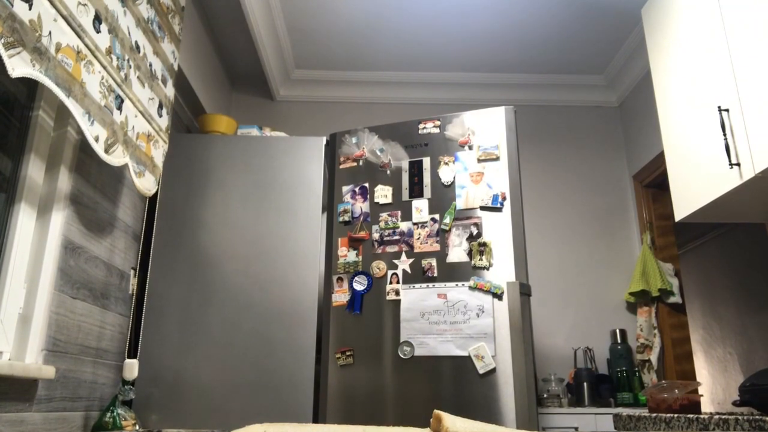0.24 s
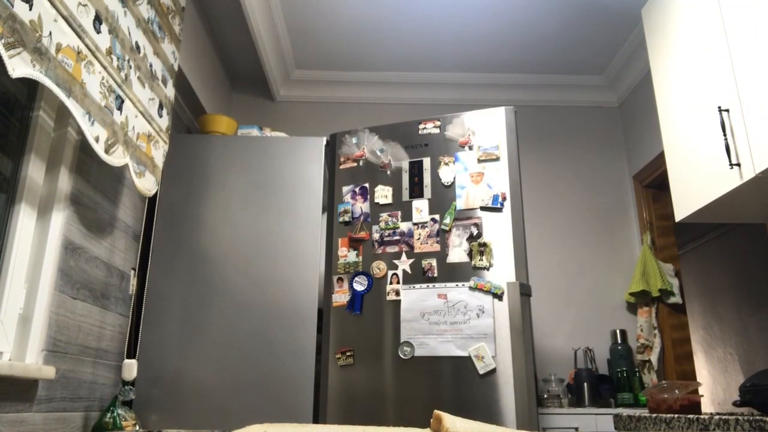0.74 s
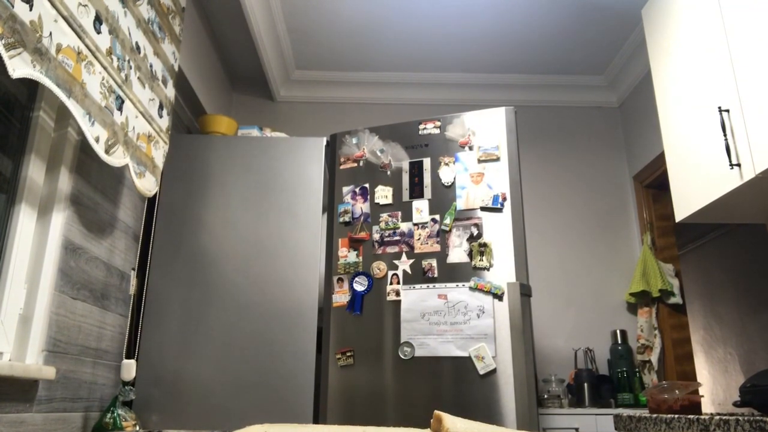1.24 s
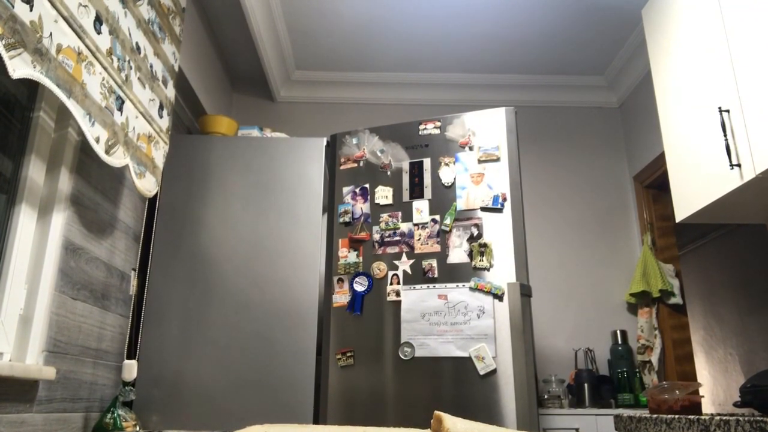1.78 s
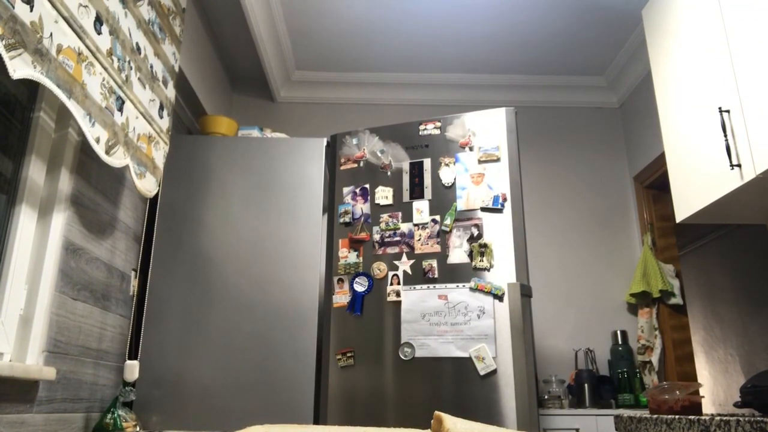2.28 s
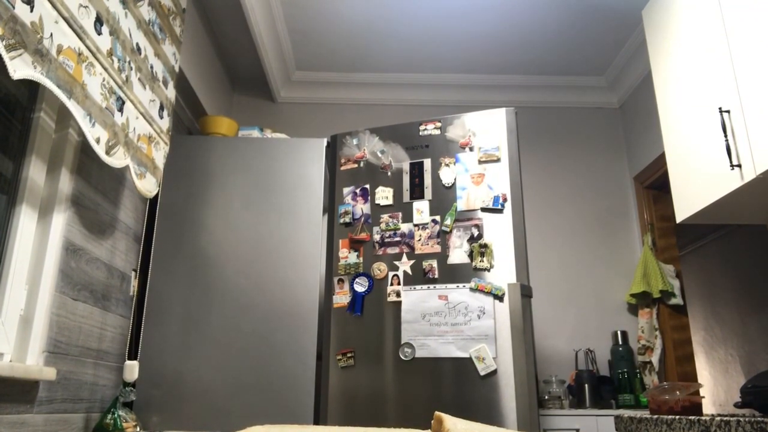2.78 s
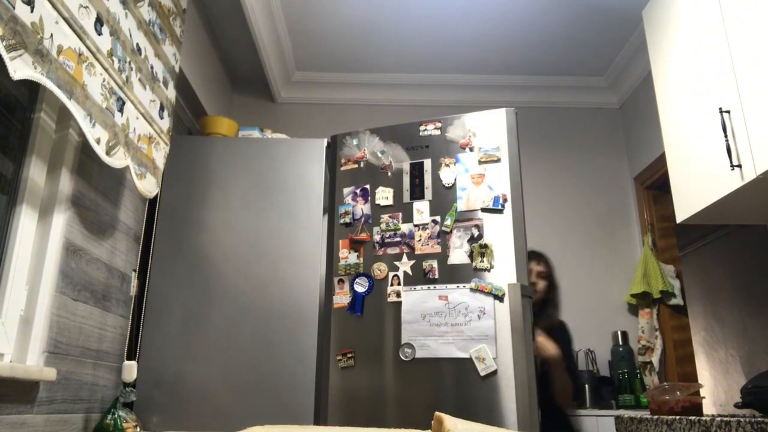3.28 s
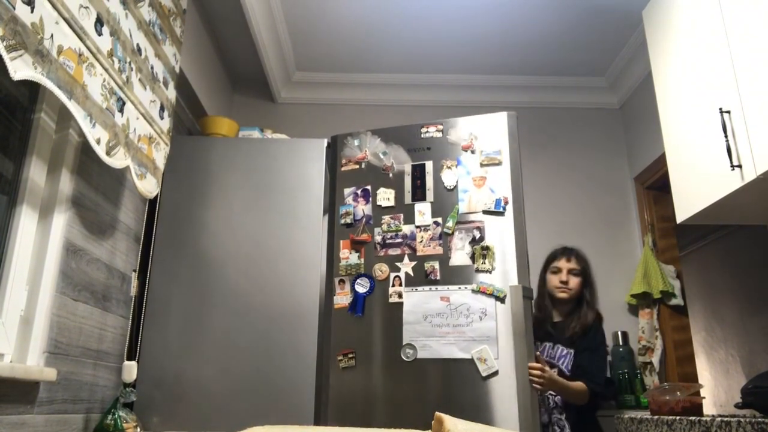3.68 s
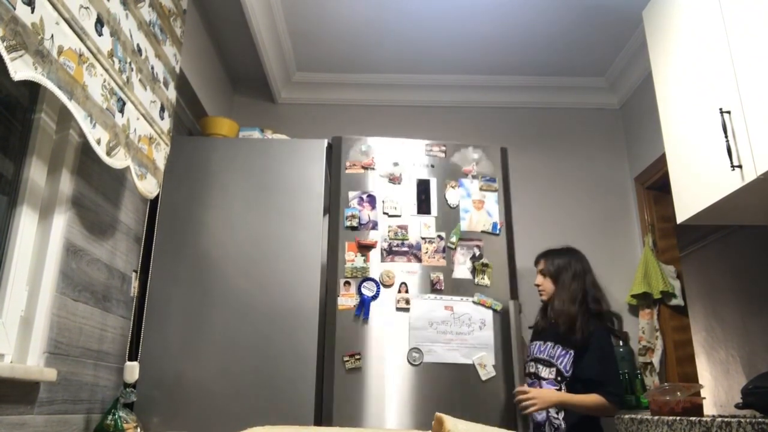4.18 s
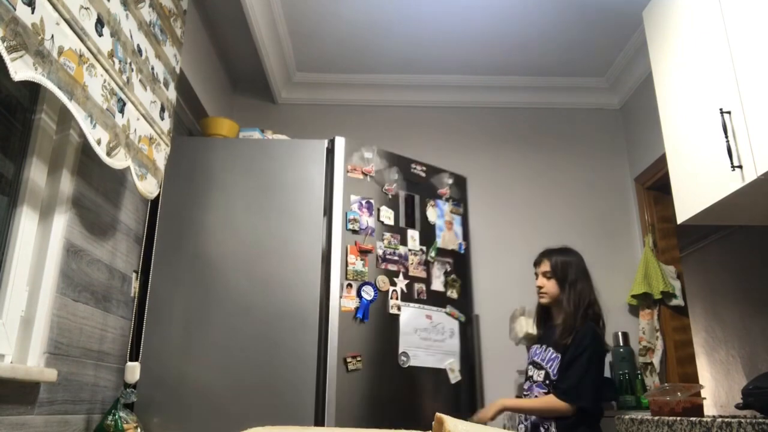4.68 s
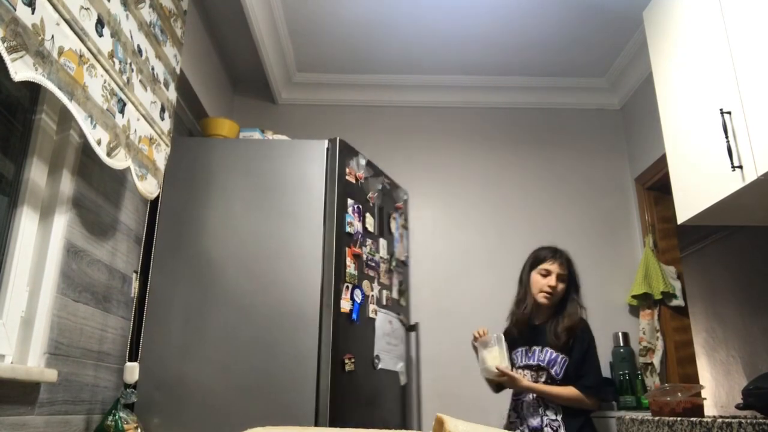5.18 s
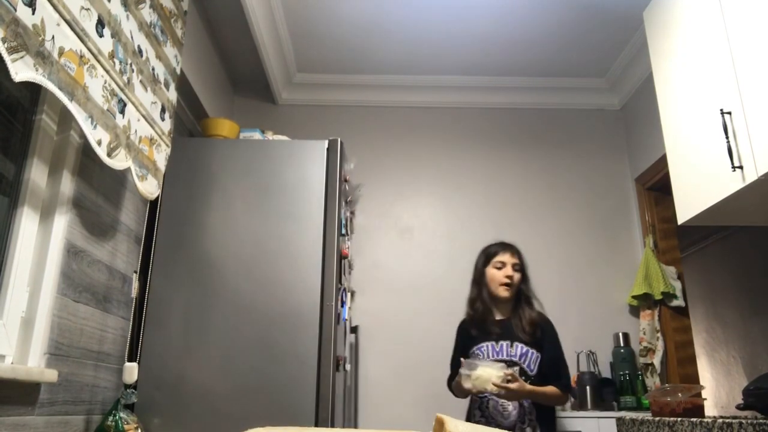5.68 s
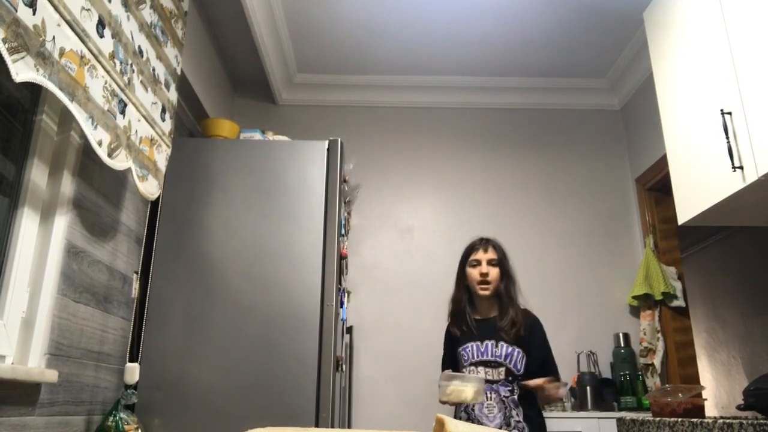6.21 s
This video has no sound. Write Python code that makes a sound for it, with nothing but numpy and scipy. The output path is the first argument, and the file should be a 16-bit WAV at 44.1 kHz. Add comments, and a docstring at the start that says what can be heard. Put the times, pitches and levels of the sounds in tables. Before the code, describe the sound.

A few steps from the microphone in a small hard kitchen, someone rummages behind an open refrigerator door. Drawer and plastic tubs bump, thud and rattle, peaking just before two seconds, then a container slides out. Sparse light knocks and tiny bottle clinks follow, a sharp plastic clack sounds at five seconds, and the door closes softly with low air pressure. A steady fan hum stays beneath.

```python
"""A drawer and containers knock, scrape and slide in an open refrigerator, a few steps away in a hard kitchen.
Each contact rings modes of drawer, shelf, tub and edges, and single pitches ring out of some blows.
Friction is filtered noise with a grainy level; a plastic tub is lifted out and its loose lid rattles.
Bottles clink in the door as decaying glass modes; it shuts softly with a push of air, slow dying sines.
A sleeve brushes past; the fan and compressor hum underneath as shaped noise with narrow bands."""
import sys
import numpy as np
from scipy import signal
from scipy.fft import rfft, irfft, next_fast_len
from scipy.io import wavfile
from scipy.ndimage import uniform_filter1d, map_coordinates

SR = 44100
rng = np.random.default_rng(int(sys.argv[2]) if len(sys.argv) > 2 else 0)


def int16_out(signal):
    """Quantize to a 16-bit WAV file."""
    q = np.round(np.clip(np.atleast_2d(signal).T, -1, 1) * 32767)
    wavfile.write(sys.argv[1], SR, q.astype(np.int16))


def elevation(decibels):
    """Turn decibel levels (scalar or array-like) into linear amplitude ratios."""
    levels = np.asarray(decibels, float)
    return 10 ** (levels / 20)


N = 284385  # length of the scene [samples]

# hard knocks and clicks: (time [s], shelf level [dB], weight: drawer over shelf [dB], hardness: edges over shelf [dB])
KNOCKS = [(1.264, -47, -23, 7.5), (1.317, -40.5, -4, 0.5), (1.57, -36, 5.5, -15), (1.626, -39, 3, -17),
          (1.671, -37.5, 0, -0.5), (1.803, -24.5, 3, -16), (1.81, -28.5, 3, -5.5), (2.408, -48.5, -8, -7),
          (2.14, -44.5, -4.5, 14), (2.498, -38.5, 6, -13.5), (2.583, -40, -3.5, -12.5),
          (2.752, -51, 5, -13), (2.969, -40.5, 7.5, -7.5), (3.005, -47.5, 5, 1.5), (3.494, -39, -4, -8),
          (3.949, -71, 10, 11), (4.195, -45, -2, -21), (4.341, -57.5, -7, -3), (4.38, -65, -17, 5.5),
          (4.541, -52, 4, -11.5), (4.902, -57, -13, -4), (4.954, -43, -2.5, -29), (5.012, -47.5, -20, 0.5),
          (5.049, -30, -26, 3), (5.503, -45, -17, -6), (5.676, -45.5, 2.5, -8.5), (6.019, -52, -2, -7)]
# softer bumps that scrape, same columns as the knocks
BUMPS = [(.001, -46.5, 3.5, -9), (.055, -35.5, 3, -10), (.525, -42.5, 0.5, -6), (.618, -49.5, -13, -3.5),
         (1.071, -38.5, 1.5, -10.5), (2.1, -48, 5.5, -3.5), (.578, -44.5, 9, -14), (.755, -42, 1, -3),
         (.872, -43, -7, -1.5), (.899, -32.5, 1, -8), (1.348, -50.5, 3, 2), (1.419, -29.5, 3, -19),
         (1.437, -25, 5, -15.5), (1.462, -36.5, 7, -5), (1.592, -52.5, 13.5, -31), (1.811, -20, 0, -26.5),
         (1.858, -20.5, -2, -17), (1.878, -38.5, 7.5, -26), (2.29, -48, 10.5, -23), (2.528, -40.5, 6, -17),
         (2.59, -47.5, 13, -26), (3.506, -45, 6.5, -7), (3.858, -58.5, -6, -15), (5.066, -36, -24, 1),
         (5.795, -54, 6.5, -10.5), (5.85, -56.5, 4.5, -14)]
# modes of each struck part: (centre [Hz], width [Hz], relative level [dB])
DRAWER_MODES = [(187, 34, 2.5), (243, 40.5, -2.5), (328, 29.7, 1), (453, 57, -4)]
SHELF_MODES = [(661, 105, 9), (868, 98, 12.5), (924, 208, 12), (1179, 180, 11.5), (1550, 196, 0)]
TUB_MODES = [(1760, 680, 0.99), (2650, 300, 5.85), (3340, 980, 0.98)]
EDGE_MODES = [(4050, 1600, 6), (6070, 3400, 11), (7660, 1500, -7), (9680, 3300, 15), (12500, 1400, 2),
              (15100, 2000, -17)]
# the whole cabinet is shaken: (time [s], level [dB])
THUMPS = [(.001, -44), (0.055, -34.5), (0.537, -39), (0.579, -32.5), (0.907, -28.5), (1.078, -36.5),
          (1.423, -30.5), (1.573, -40), (1.814, -26), (1.859, -37), (2.139, -38), (2.588, -38),
          (2.752, -42), (2.998, -46.5), (3.501, -29.5), (4.197, -45), (.95, -34.5), (5.851, -41.5),
          (6.021, -47)]
# cabinet modes: (centre [Hz], width [Hz], relative level [dB])
CABINET_MODES = [(66, 6.3, -7), (95.8, 25, -2.5), (108.2, 10.9, 1)]
# single ringing pitches within blows, several may belong to one blow:
# (time [s], level [dB], pitch [Hz], width of each of two stages [Hz])
RINGING_PARTIALS = [(2.142, -24.5, 5540, 1880), (3.492, -48, 5560, 90), (3.493, -36.5, 664, 131),
                    (3.499, -32, 420, 139), (3.503, -43, 2140, 400), (6.02, -57.5, 2650, 500),
                    (4.344, -63, 6600, 600), (4.38, -60, 3630, 600), (5.053, -35, 410, 152),
                    (5.051, -35, 4270, 700), (5.054, -29.5, 1380, 494), (5.215, -41, 1040, 420),
                    (5.505, -43.5, 2900, 900), (5.675, -51.5, 2760, 400)]
# the loose lid rattles: (time [s], body level [dB], rim over body [dB])
RATTLES = [(.001, -40.5, -16), (0.02, -47, -22), (0.06, -36, -2.5), (0.074, -47, -22), (1.26, -42.5, -1),
           (1.271, -41.5, 0), (1.297, -42, 0.5), (1.318, -38.5, 4.5), (1.341, -35.5, -16),
           (1.358, -40, -5.5), (1.374, -46, -13), (1.389, -50, -11), (1.45, -30.5, -0.5),
           (1.477, -34.5, -2), (1.866, -27, -2.5), (1.882, -22.5, -20), (2.148, -37, -10),
           (5.078, -32.5, 5)]
# lid modes: (centre [Hz], width of each of two stages [Hz], relative level [dB])
LID_BODY_MODES = [(1015, 205, 2.5), (1158, 270, -5)]
LID_RIM_MODES = [(2200, 330, -5.5), (2650, 250, -0.7), (3356, 160, -5)]
# hollow ticks with evenly spaced overtones: (time [s], level [dB], spacing [Hz])
TICKS = [(4.89, -69, 2950), (4.902, -53, 2930), (5.478, -54, 2200), (6.028, -49, 2200)]
# bottles touch: (time [s], level [dB])
CLINKS = [(4.194, -55.5), (4.496, -67), (4.560, -68)]
# glass modes: (pitch [Hz], relative level [dB], time to fall 60 dB [s])
GLASS_MODES = [(4325, -2, 0.08), (5445, 1, 0.06), (5800, -5, .05), (6350, -7, 0.012), (7245, 2, 0.06),
               (9030, -11, 0.03)]
# slides along the shelves: (start [s], length [s], level [dB], fade by the end [dB],
# rustle over scrape [dB], tub's rasp over scrape [dB])
SLIDES = [(0.131, 0.19, -50.5, 27, -7, -11), (1.54, 0.32, -63, -13, -6, -4),
          (2.184, 0.54, -43.5, 10, -7.5, -19), (5.536, 0.42, -47, 20.5, -25, -6),
          (6.287, 0.15, -68.5, 5, -4, 1)]
# a sleeve brushes past: (start [s], length [s], level [dB])
SLEEVE = [(.67, 0.081, -55), (3.2, 0.26, -57), (5.355, 0.014, -58.5), (6.335, 0.017, -59.5)]
# spectra of the low rumble and the fine rustle: (frequency [Hz], density [dB per Hz])
RUMBLE_SPECTRUM = [(24, -52), (40, -2), (91, 5), (253, -15), (333, -3.5), (700, -13), (910, -58),
                   (1540, -120)]
RUSTLE_SPECTRUM = [(2060, -13), (3500, -4), (4930, -3.5), (9810, -2.5), (11900, -4), (16000, -15)]
# the shutting door squeezes the air: (time [s], level [dB], pitch [Hz], time to fall 60 dB [s])
AIR_SWINGS = [(5.544, -31, 65, 0.54), (5.71, -32, 52, 0.96), (5.806, -24.5, 18.96, 0.82),
              (6.031, -29.5, 16.3, 0.93)]
# mean levels of the running machine: (time [s], hum [dB], hiss [dB])
MACHINE_LEVELS = [(0, -47.5, -64.5), (1.2, -47.5, -66), (2.901, -48.5, -65.5), (3.702, -49, -67),
                  (4.802, -50, -68), (6.45, -49.5, -69)]
# spectra of hum and hiss: (frequency [Hz], density [dB per Hz])
HUM_SPECTRUM = [(11, -28), (18, 5), (92, 3.5), (133, -0.5), (192, -1.5), (389, -8.5), (418, -14.5),
                (573, -9), (677, -18), (1080, -17.5), (1500, -24.5), (1950, -65), (3300, -120)]
HISS_SPECTRUM = [(820, -16), (1400, 0.5), (1810, 0), (2720, -4), (2800, -2.5), (4000, -8), (7530, -10.5),
                 (8160, -9.5), (11300, -8.5), (16000, -34)]
# fan air passages: (centre [Hz], width [Hz], level [dB rms])
DUCT_BANDS = [(214.3, 48, -54.5), (354.8, 24, -62), (585.5, 39, -63.5), (818, 50, -67.5), (1075, 79, -64.5),
              (2930, 13, -79.5)]
# kitchen reverberation: (frequency [Hz], time to fall 60 dB [s])
KITCHEN_DECAY = [(60, 0.071), (250, 0.4), (1000, 0.29), (4000, 0.23), (14000, 0.16)]
# dips of the microphone housing: (centre [Hz], width [Hz], depth [share])
HOUSING_DIPS = [(4960, 240, 0.49), (10500, 1560, 0.5)]

SIZE = 32768  # length of one event's spectrum [samples]
EVENT_HZ = np.fft.rfftfreq(SIZE, 1 / SR)


def unit(x):
    """Scaled to rms 1."""
    return x / np.sqrt(np.mean(x ** 2) + 1e-20)


def along(points, hz):
    """Reads (Hz, value) points on a log frequency axis."""
    f, v = np.transpose(points)
    return np.interp(np.log(hz + 1), np.log(f + 1), v)


def wobble(rate):
    """A smooth random curve, rate knots a second."""
    knots = rng.standard_normal(int(N * rate / SR) + 4)
    return map_coordinates(knots, [np.arange(N) * rate / SR])


def noise(gain):
    """Noise of rms 1 with a gain for each frequency."""
    m = next_fast_len(N)
    spectrum = rfft(rng.standard_normal(m)) * gain(np.fft.rfftfreq(m, 1 / SR))
    return unit(irfft(spectrum, m)[:N])


def resonances(modes, hz, offsets_db=None):
    """Causal response of damped modes, alternating in sign, with an optional level offset for each."""
    if offsets_db is None:
        offsets_db = np.zeros(len(modes))
    total = 0
    for k, (centre, width, db) in enumerate(modes):
        mode = 1j * hz * width / (centre * centre - hz * hz + 1j * hz * width)
        total = total + (-1) ** k * elevation(db + offsets_db[k]) * mode
    return total


def two_stage(centre, width):
    """One mode passed twice, so that its ring swells before it dies."""
    return resonances([(centre, width, 0)], EVENT_HZ) ** 2


def shifted(modes):
    """A different grip or load shifts the modes from blow to blow."""
    detune = 0.049  # typical shift [share of the pitch]
    return [(centre * (1 + detune * rng.standard_normal()), width, db) for centre, width, db in modes]


def rung(modes):
    """One blow on a set of modes, each a little off in pitch and level."""
    return resonances(shifted(modes), EVENT_HZ, 2.16 * rng.standard_normal(len(modes)))


def below(top_hz):
    """Two-pole low-pass; one minus it passes the treble."""
    return 1 / (1 + 1j * EVENT_HZ / top_hz) ** 2


def kitchen(build_up_s):
    """Spectrum of one sound's way to the microphone: a direct share, then a fresh tail dying by frequency."""
    f, t, z = signal.stft(rng.standard_normal(SR // 2), SR, nperseg=256)
    room = elevation(-60 * t / along(KITCHEN_DECAY, f)[:, None])
    hallway = elevation(-29.5 - 60 * t / 0.97)  # fainter, but it lingers
    tail = signal.istft(z * (room + hallway), SR, nperseg=256)[1]
    tail *= 1 - np.exp(-np.arange(len(tail)) / SR / build_up_s)
    direct = 0.00038 / build_up_s  # the sharper the click, the more direct it is
    return direct + rfft(tail / np.linalg.norm(tail), SIZE)


def add(out, s, db, spectrum):
    """Lays a sound into out, its loudest 20 ms at db rms."""
    x = irfft(spectrum, SIZE)[:SR // 2]
    loudest = np.sqrt(np.abs(uniform_filter1d(x ** 2, size=SR // 50)).max())
    out[round(s * SR):][:len(x)] += elevation(db) * x / loudest


def chatter(lasts_s, share, count):
    """A blow and its tiny bounces at random moments, the later ones tending larger, each of either sign."""
    total = 1
    for delay, size in zip(*rng.random((2, count))):
        strength = share * (2 * size - 1) * (1 + 2 * delay)
        total = total + strength * np.exp(-2j * np.pi * EVENT_HZ * lasts_s * delay)
    return total


def contacts():
    """A contact rings the shelf, the drawer by its weight, tub and edges by its hardness; the kitchen answers."""
    tub_db, tub_hardens = -0.08, 0.57  # tub over shelf [dB]; how far it follows the hardness [share]
    top_edge_hz, db_per_octave = 28000, 12  # treble corner [Hz]; hardness that lifts it an octave [dB]
    drawer_band = below(780) * (1 - below(277)) ** 2
    shelf_band = below(2760) * (1 - below(250))
    tub_band = below(7400) * (1 - below(390))
    edge_band = 1 - below(11200)
    out = np.zeros(N + SR)
    # events, build-up [s], span of the bounces [s], strength of the bounces [share], number of bounces
    kinds = ((KNOCKS, 0.0015, 0.012, 0.2, 4), (BUMPS, 0.007, 0.016, 1.1, 12))
    for events, build_up_s, lasts_s, share, count in kinds:
        for s, db, weight, hard in events:
            blow = chatter(lasts_s, share, count) * kitchen(build_up_s)
            blow = blow * below(top_edge_hz * 2 ** (hard / db_per_octave))
            add(out, s, db + weight, blow * drawer_band * rung(DRAWER_MODES))
            add(out, s, db, blow * shelf_band * rung(SHELF_MODES))
            add(out, s, db + tub_db + tub_hardens * hard, blow * tub_band * rung(TUB_MODES))
            add(out, s, db + hard, blow * edge_band * rung(EDGE_MODES))
    return out[:N]


def ringing_partials():
    """Single ringing pitches within blows, each one two-stage mode; several may belong to one blow."""
    out = np.zeros(N + SR)
    for s, db, pitch_hz, width in RINGING_PARTIALS:
        add(out, s, db, kitchen(0.00087) * two_stage(pitch_hz, width))
    return out[:N]


def thumps():
    """The shaken cabinet rings its lowest modes."""
    out = np.zeros(N + SR)
    for s, db in THUMPS:
        add(out, s, db, kitchen(0.0061) * below(120) * rung(CABINET_MODES))
    return out[:N]


def scrape_and_rustle():
    """Friction noise coloured by shelf, tub and drawer, and a fine treble noise with the same grain."""
    grain = elevation(1.1 * wobble(60) + 2.2 * wobble(500))

    def body(hz):
        drawer = elevation(10) * abs(resonances(DRAWER_MODES, hz))
        parts = abs(resonances(SHELF_MODES, hz)) + abs(resonances(TUB_MODES, hz)) + drawer
        return parts / (1 + (hz / 5000) ** 2)

    scrape = grain * noise(body)
    rustle = grain * noise(lambda hz: elevation(along(RUSTLE_SPECTRUM, hz)))
    return scrape, rustle


def stroke_gate(t, s, length):
    """Opens 37 ms before the start and closes 78 ms after the end, over 63 ms ramps."""
    return np.clip(np.minimum(t - s + 0.037, s + length + 0.078 - t) / 0.063, 0, 1)


def sliding():
    """Friction along the shelves: cabinet rumble, scrape, the tub's grainy rasp and a fine rustle."""
    rumble_db, fade_bends = 6, 1.83  # over the scrape [dB]; a stroke holds, then slows [exponent]
    t, out = np.arange(N) / SR, np.zeros(N)
    rumble = unit(elevation(0.45 * wobble(48)) * noise(lambda hz: elevation(along(RUMBLE_SPECTRUM, hz))))
    scrape, rustle = scrape_and_rustle()

    def tub_colour(hz):
        return abs(resonances(TUB_MODES, hz)) * hz / (hz + 900) / (1 + (hz / 2400) ** 4)

    rasp = elevation(3.6 * wobble(35) + 1.8 * wobble(300)) * noise(tub_colour)
    for s, length, db, fade_db, rustle_db, rasp_db in SLIDES:
        fade = fade_db * np.clip((t - s) / length, 0, 1) ** fade_bends
        layers = elevation(rumble_db) * rumble + scrape + elevation(rustle_db) * rustle + elevation(rasp_db) * rasp
        out += stroke_gate(t, s, length) * elevation(db - fade) * layers
    return out


def lid_rattles():
    """The loose lid rings its body and, at a level of its own, its rim."""
    out = np.zeros(N + SR)
    for s, db, rim_db in RATTLES:
        heard = kitchen(0.0006)
        for over, modes in ((0, LID_BODY_MODES), (rim_db, LID_RIM_MODES)):
            ring = sum(elevation(level) * two_stage(centre, width) for centre, width, level in shifted(modes))
            add(out, s, db + over, heard * ring)
    return out[:N]


def hollow_ticks():
    """Short ticks of broad, evenly spaced overtones that strengthen upwards."""
    width_hz, rise_db, top_hz = 960, 2, 12500  # stage width; gain per overtone; limit for overtones
    out = np.zeros(N + SR)
    for s, db, step_hz in TICKS:
        overtones = range(1, int(top_hz / step_hz) + 1)
        tones = sum(elevation(rise_db * k) * two_stage(k * step_hz, width_hz) for k in overtones)
        add(out, s, db, kitchen(0.0009) * tones)
    return out[:N]


def bottle_clinks():
    """Touching bottles ring narrow glass modes, their balance varying from clink to clink."""
    # a mode's width follows from its decay time
    ring = [(pitch, np.log(1000) / np.pi / t60, level) for pitch, level, t60 in GLASS_MODES]
    out = np.zeros(N + SR)
    for s, db in CLINKS:
        balance_db = 1.1 * rng.standard_normal(len(ring))
        add(out, s, db, kitchen(0.00084) * resonances(ring, EVENT_HZ, balance_db))
    return out[:N]


def door_air():
    """Slow pressure swings of the room and cabinet as the seal closes."""
    t, out = np.arange(N) / SR, np.zeros(N)
    for s, db, hz, t60 in AIR_SWINGS:
        since = np.clip(t - s, 0, None)
        onset = 1 - np.exp(-since / 0.014)
        out += elevation(db - 60 * since / t60) * onset * np.sin(2 * np.pi * hz * since)
    return out


def sleeve():
    """A sleeve brushes past: short strokes of the scrape with a fine rustle."""
    t, out = np.arange(N) / SR, np.zeros(N)
    scrape, rustle = scrape_and_rustle()
    for s, length, db in SLEEVE:
        out += stroke_gate(t, s, length) * elevation(db) * (scrape + elevation(-5.5) * rustle)
    return out


def hum():
    """Broad fan and compressor noise and hiss, with narrow bands where the air passages resonate."""
    s, hum_db, hiss_db = np.transpose(MACHINE_LEVELS)
    t = np.arange(N) / SR
    low_level = elevation(np.interp(t, s, hum_db) + 2.2 * wobble(3.91))
    low = low_level * noise(lambda hz: elevation(along(HUM_SPECTRUM, hz)))
    high_level = elevation(np.interp(t, s, hiss_db) + 0.12 * wobble(6.9))
    high = high_level * noise(lambda hz: elevation(along(HISS_SPECTRUM, hz)))
    bands = sum(elevation(db) * noise(lambda hz: 1 / (1 + ((hz - c) / w * 2) ** 2)) for c, w, db in DUCT_BANDS)
    return low + high + bands


def scene():
    """All sources at one microphone."""
    handling = contacts() + ringing_partials() + thumps() + sliding()
    door = bottle_clinks() + door_air()
    return (handling + lid_rattles() + hollow_ticks() + door + sleeve() + hum())[None]


def band_limit(x):
    """A steep low-pass at the top of the band."""
    return signal.sosfilt(signal.butter(12, 16650, fs=SR, output="sos"), x)


def record(dry):
    """The microphone: two dips of its housing, a treble roll-off and a sharp top limit."""
    m = next_fast_len(N + SR // 4)
    hz = np.fft.rfftfreq(m, 1 / SR)
    dips = np.prod([1 - depth / (1 + ((hz - c) / w * 2) ** 2) for c, w, depth in HOUSING_DIPS], axis=0)
    roll_off = (hz < 15850) / (1 + (hz / 13000) ** 7)
    mix = irfft(rfft(dry, m) * dips * roll_off, m)[:, :N]
    return band_limit(mix)


dry = scene()
out = record(dry)
int16_out(out)
```